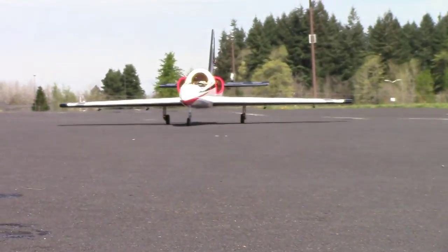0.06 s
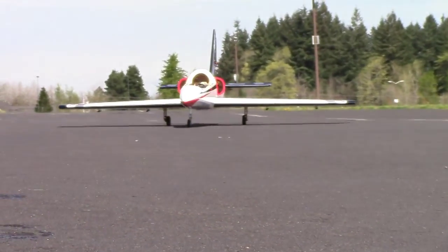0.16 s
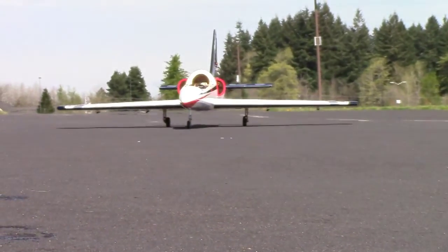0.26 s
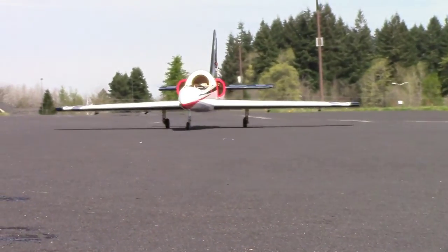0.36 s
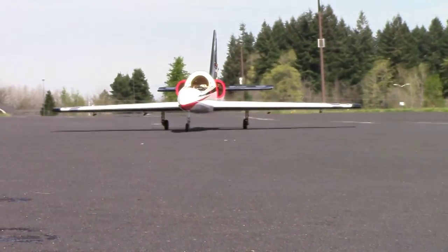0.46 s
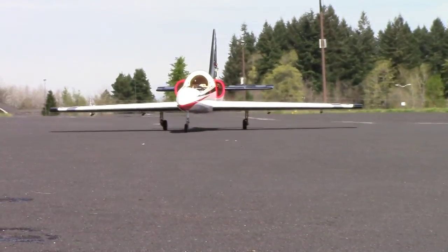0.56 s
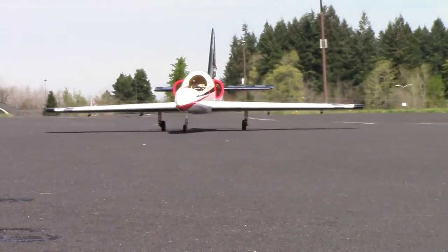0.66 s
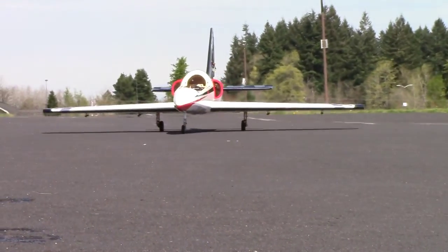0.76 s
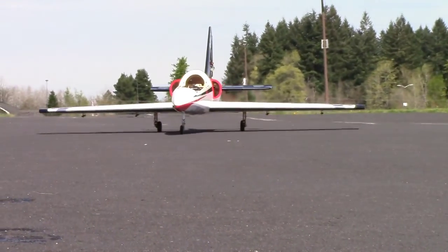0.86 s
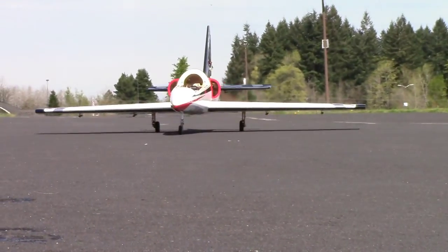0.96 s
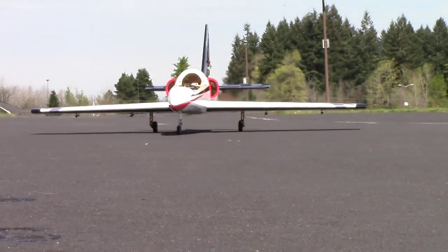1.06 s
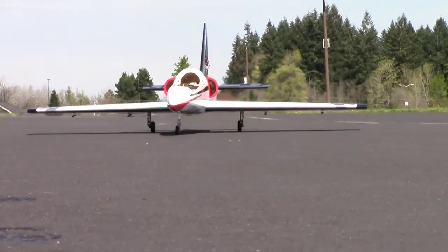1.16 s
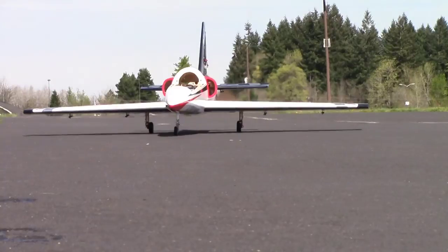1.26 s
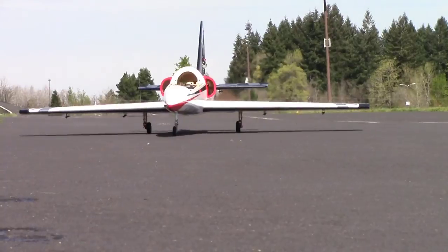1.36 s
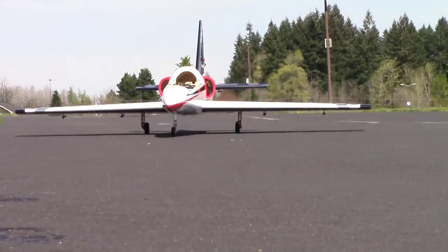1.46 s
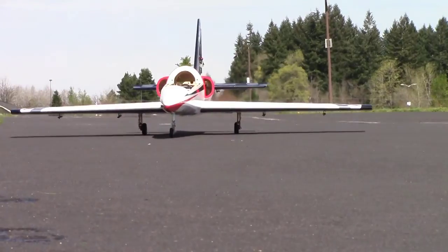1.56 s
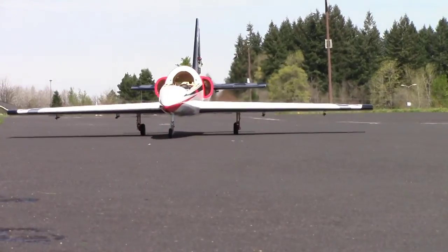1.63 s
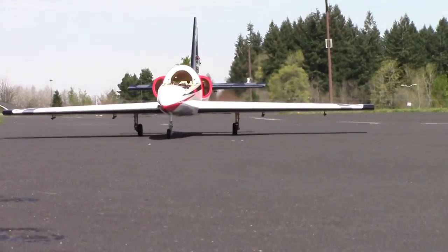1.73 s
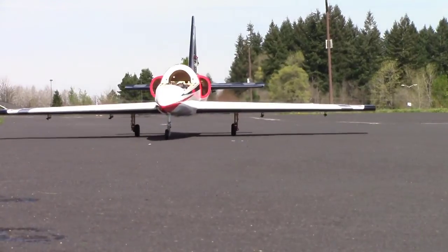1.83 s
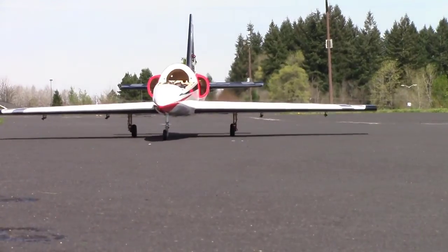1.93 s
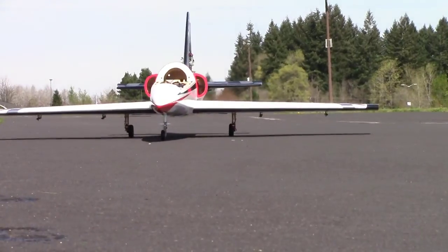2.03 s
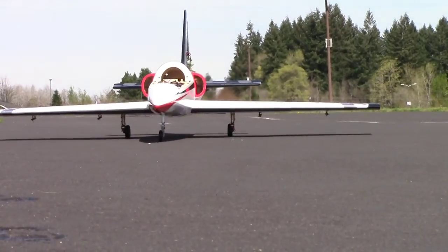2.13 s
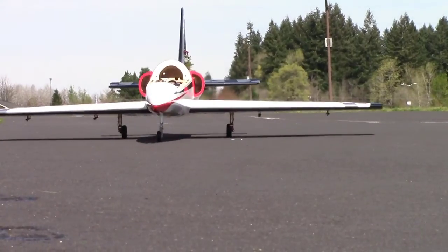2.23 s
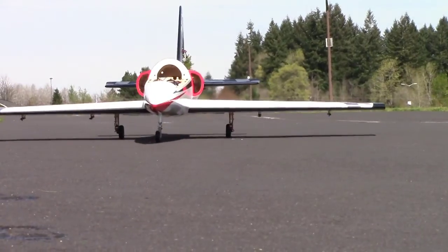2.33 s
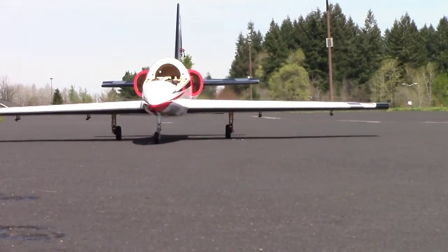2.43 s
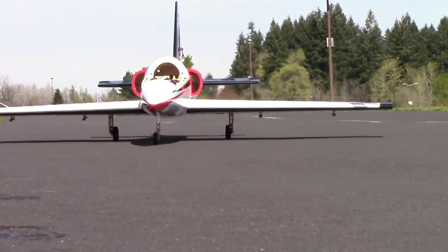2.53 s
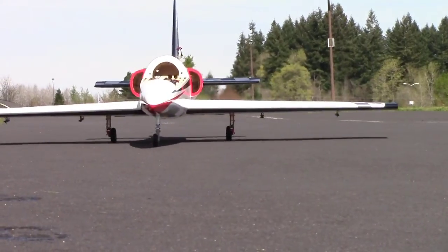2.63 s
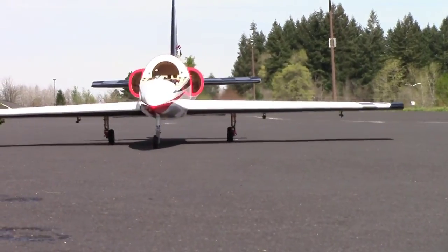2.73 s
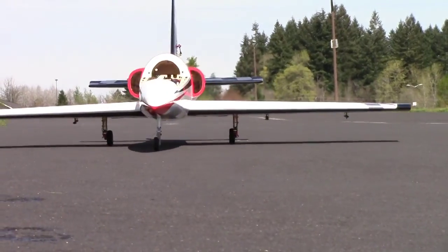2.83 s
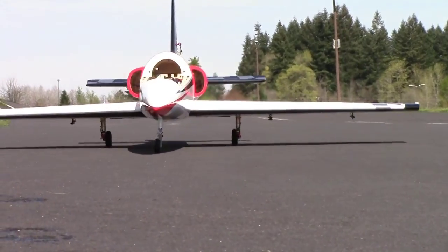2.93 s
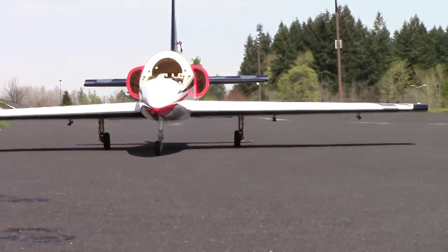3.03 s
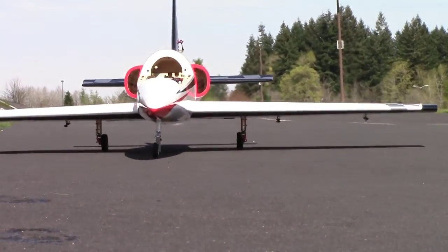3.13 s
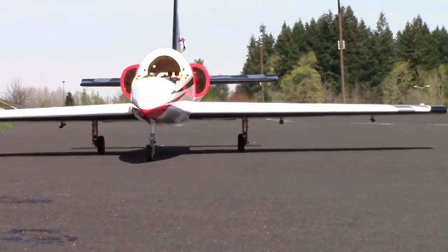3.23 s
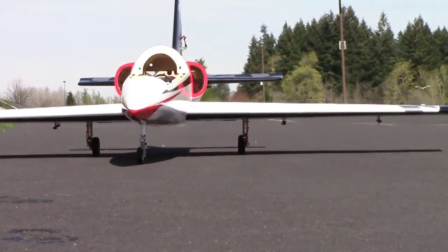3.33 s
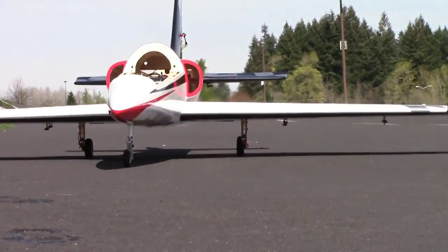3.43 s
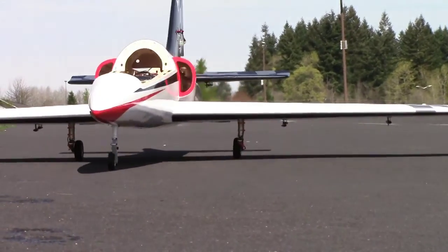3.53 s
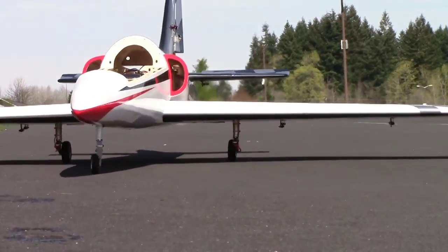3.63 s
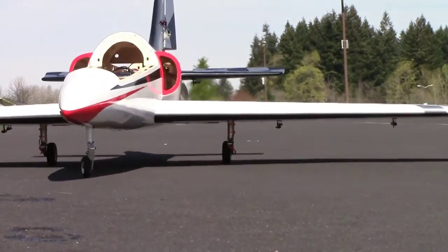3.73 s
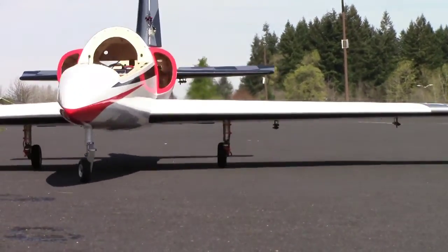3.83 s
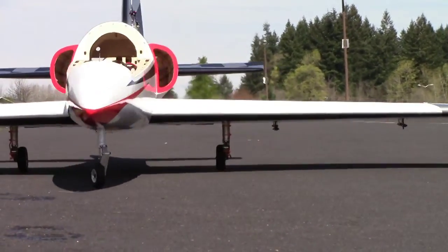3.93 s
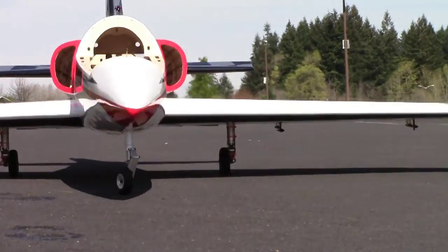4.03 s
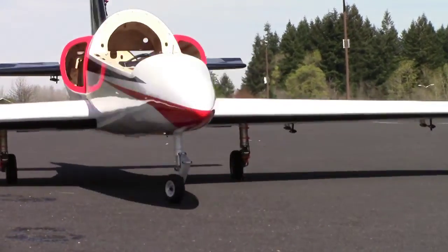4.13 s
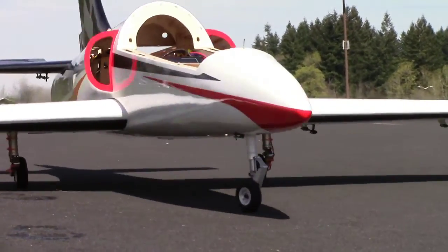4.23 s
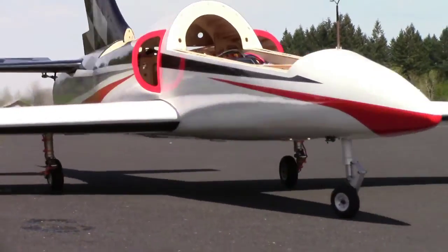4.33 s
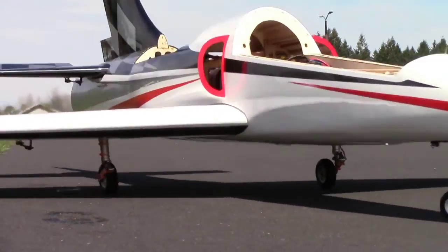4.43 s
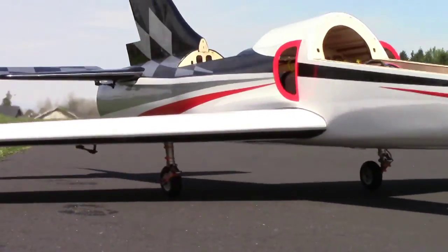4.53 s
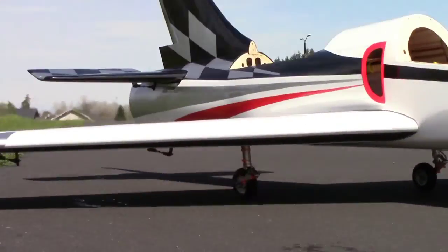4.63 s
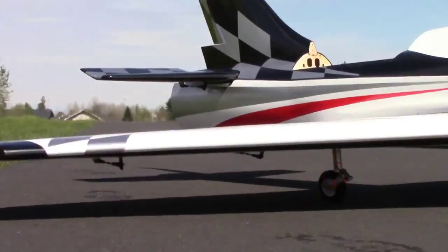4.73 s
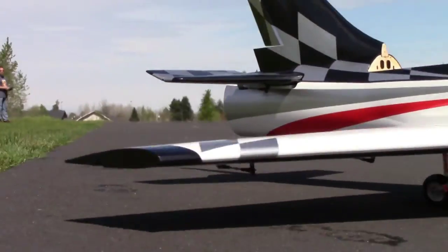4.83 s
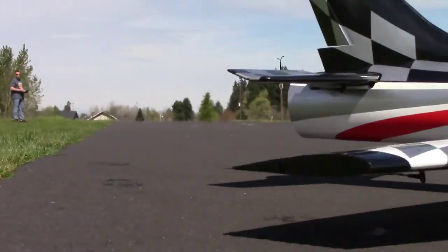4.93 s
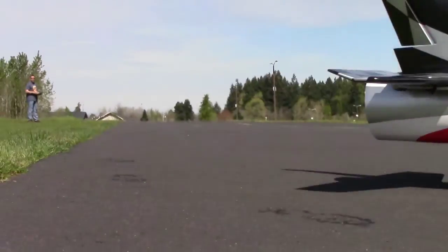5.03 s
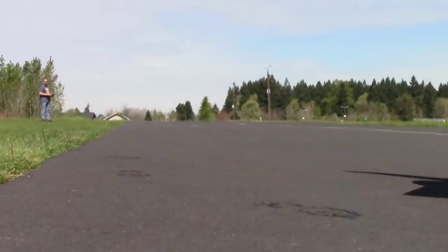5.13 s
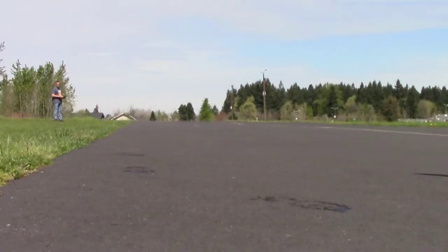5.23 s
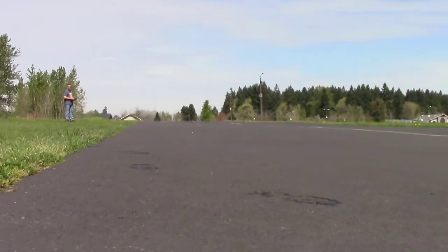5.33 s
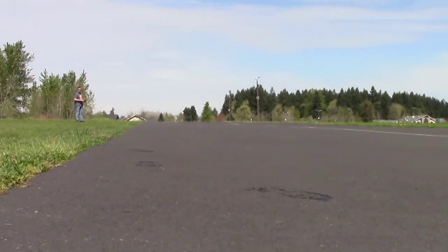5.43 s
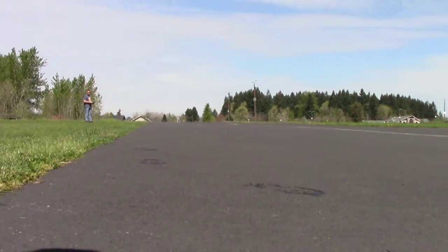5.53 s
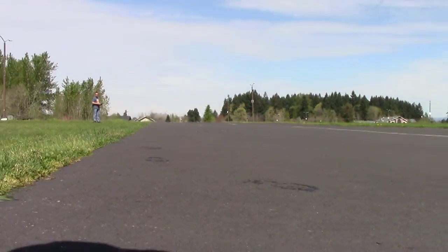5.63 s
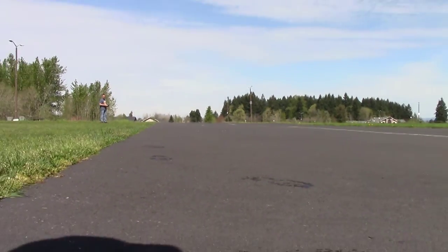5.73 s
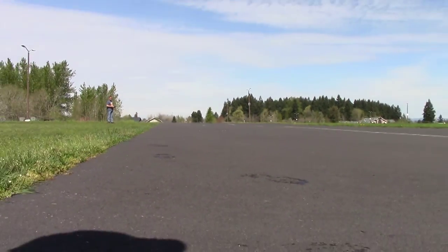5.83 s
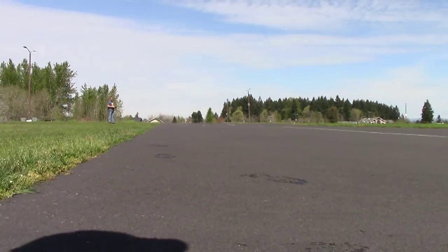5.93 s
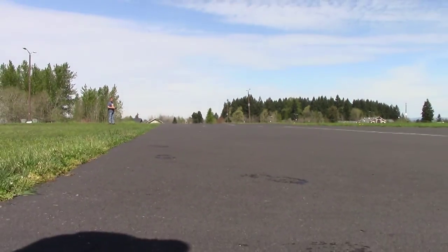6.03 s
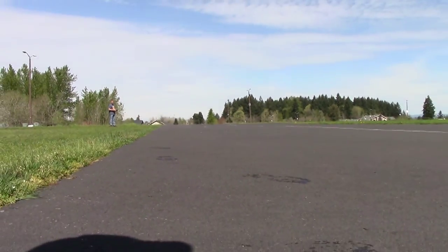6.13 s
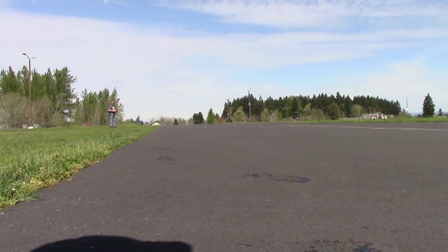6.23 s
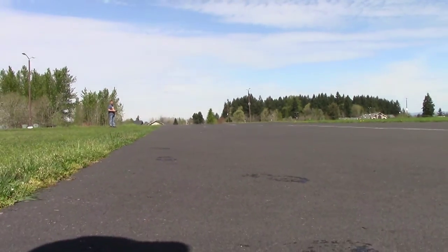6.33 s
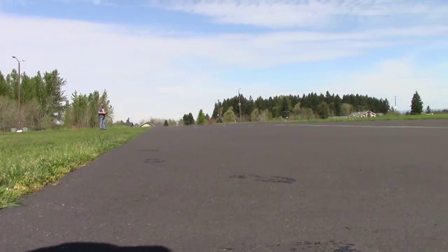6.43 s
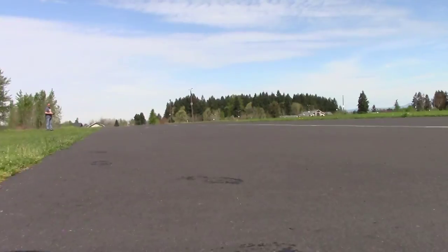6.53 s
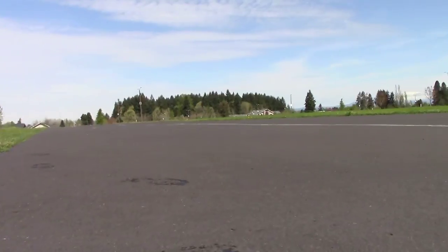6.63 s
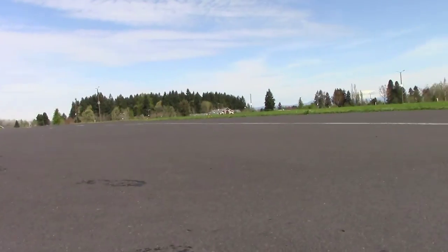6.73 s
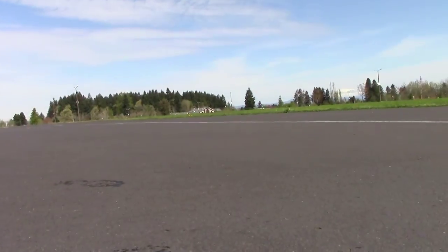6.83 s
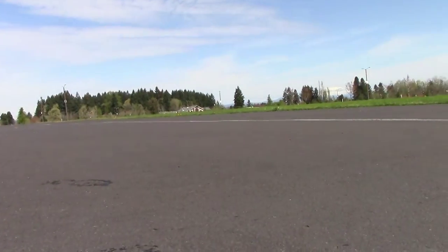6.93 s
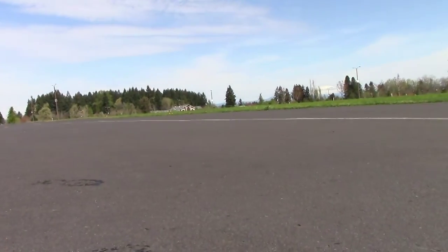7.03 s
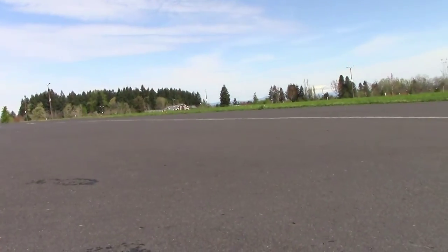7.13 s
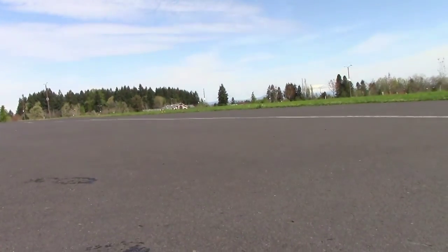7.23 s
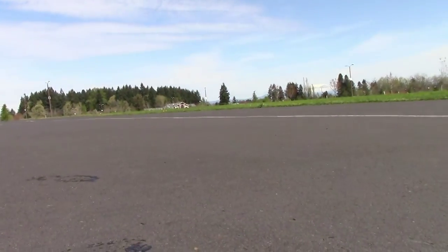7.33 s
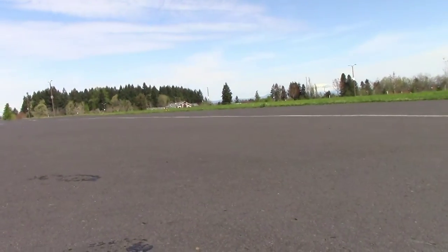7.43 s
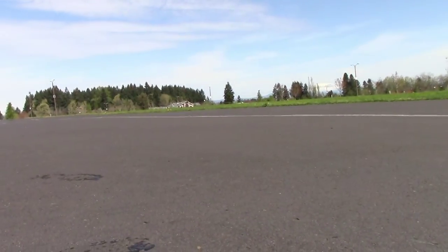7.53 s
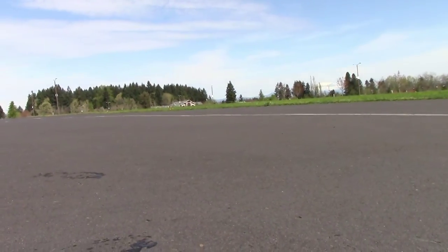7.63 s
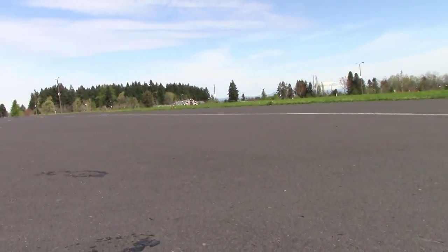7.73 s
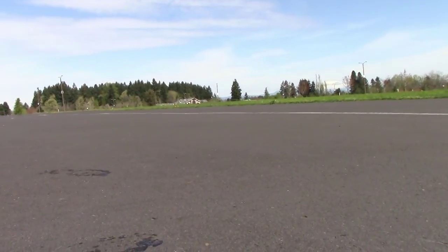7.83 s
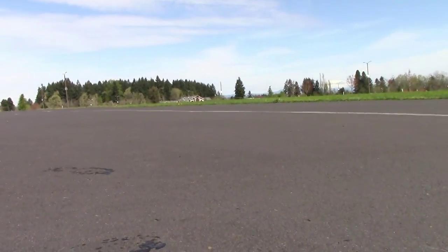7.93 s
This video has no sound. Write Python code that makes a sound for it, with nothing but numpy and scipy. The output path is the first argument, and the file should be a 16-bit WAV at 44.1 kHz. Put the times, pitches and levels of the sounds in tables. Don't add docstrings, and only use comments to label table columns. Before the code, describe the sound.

Piercing turbine whistle and airy intake roar approach outdoors, turn into hissing exhaust rush, then the pitch sinks as the throttle is cut.

```python
import sys
import numpy as np
from scipy import signal
from scipy.io import wavfile
from scipy.ndimage import uniform_filter1d, minimum_filter1d

SR = 44100
rng = np.random.default_rng(int(sys.argv[2]) if len(sys.argv) > 2 else 0)


def dump_mix(stems):
    frames = np.atleast_2d(stems).T
    limited = np.clip(frames, -1, 1)
    pcm = np.round(limited * 32767).astype(np.int16)
    wavfile.write(sys.argv[1], SR, pcm)


def volts_from_decibels(level):
    exponent = np.asarray(level, float) / 20
    return 10 ** exponent


N = 351477
HOP = 256

PASSING = 4.307, 5.41
ABEAM = 4.8, 5.6
NEARING, LEAVING, IDLING = (0.56, 2.76), (5.7, 5.95), (6.8, 7.3)
MID_SIDE = np.array([[1, 1], [1, -1]])

# (time [s], left-right difference in the treble [dB])
BEARING = [(0.0, 0), (2.24, 2), (3.7, 2), (4.11, 3), (4.33, .1), (4.8, -.1), (5.52, -6.5), (5.68, -9),
           (6.19, -10), (6.41, -11), (6.53, -8), (7.97, -3)]
# (frequency [Hz], share [0-1])
PAN_SHARE = [(500, 0.027), (1300, .12), (2400, 0.21), (4400, 0.26), (8000, 0.48), (15000, 1)]


def ramp(x, span):
    return np.clip((x - span[0]) / (span[1] - span[0]), 0, 1)


def curve(rows, t):
    s, value = np.transpose(rows)
    return np.interp(t, s, value)


def swells(rows, t):
    return sum(db * np.exp(-((t - s) / half) ** 2) for s, half, db in rows)


def read(points, hz):
    f, value = np.transpose(points)
    return np.interp(np.log(hz + 1), np.log(f + 1), value)


def evened(x):
    return x / np.sqrt(np.mean(x ** 2) + 1e-20)


def wander(count, length):
    once = uniform_filter1d(rng.standard_normal(count), int(length))
    return evened(uniform_filter1d(once, int(length)))


def port_turn(hz, t):
    delay_s = 1.6e-6 * curve(BEARING, t)
    near = 1 - .8 * ramp(t, (6.4, 6.8))
    ports = np.array([1, -1]).reshape(-1, *[1] * np.ndim(hz))
    return np.pi * hz * delay_s * near * ports


def spool(t):
    # (time [s], shaft speed before inertia [Hz])
    throttle = [(0.18, 624.0), (0.369, 635.7), (0.66, 674.2), (0.892, 716.0), (1.451, 838.0),
                (1.786, 900.8), (2.077, 940.1), (2.654, 977.3), (3.17, 992.0), (3.797, 996.1),
                (4.206, 972.6), (5.288, 952.0), (5.459, 953.3), (5.762, 941.7), (6.128, 896.5),
                (6.806, 731.9), (7.182, 670.4), (7.881, 609.5)]
    size = round(.2 / t[1])
    once = uniform_filter1d(curve(throttle, t), size=size, mode="nearest")
    return uniform_filter1d(once, size=size, mode="nearest")


def whistle_db(t):
    # (time [s], level [dB])
    aim = [(0, -47.5), (.261, -48), (.421, -15.5), (.83, -10.5), (1.479, -8), (1.626, -2.5), (2.299, -14),
           (2.555, -16.8), (3.029, -30.5), (3.833, -24.5), (4.164, -11.5), (4.79, -17.7), (5.01, -30),
           (5.53, -29.5), (5.64, -43.5), (6.284, -40.5), (6.792, -1.5), (7.97, -37.5)]
    # (time [s], half length [s], change [dB])
    fades = [(0.429, 0.05, -5.5), (0.619, 0.092, -5), (0.824, 0.032, -9.5), (1.097, 0.031, -4.9),
             (1.173, 0.028, -7), (1.499, 0.05, -7), (1.636, 0.083, -14.5), (1.916, 0.189, -14.5),
             (2.351, 0.089, -3.0), (2.934, 0.078, -2), (3.109, 0.013, -9.0), (3.274, 0.022, -5.5),
             (3.404, 0.058, 2.5), (3.594, 0.04, -5.6), (3.74, 0.083, -13.9), (4.348, 0.03, -8),
             (4.361, 0.008, -13), (4.548, 0.065, -12), (4.644, 0.2, 13), (4.705, 0.05, -10),
             (4.724, .01, -7), (4.777, 0.012, -7), (4.82, .02, 3), (4.843, .006, -11), (4.86, .006, -11),
             (4.913, .005, -14), (4.929, .005, -12), (4.952, .006, -8), (6.504, 0.012, -10),
             (6.595, 0.021, -14.5), (6.702, 0.077, -10.5), (6.863, 0.056, -14.5), (6.979, 0.061, -11.1),
             (7.221, 0.128, -13.5), (7.305, 0.02, -5.4), (7.406, 0.076, -7.5), (7.642, 0.033, 4),
             (6.18, .1, 5), (6.4, .04, 5), (5.2, .03, -4), (5.45, .04, 3)]
    return curve(aim, t) + swells(fades, t)


def shaft_orders(t, shaft_hz, blades):
    # (time [s], half length [s], change [dB])
    casing_swells = [(.45, .35, 8), (3.3, 0.67, 6), (5.05, 0.53, 6.5), (6.1, .4, -6), (7.55, 0.38, 9)]
    half_row_swells = [(.05, 0.28, -10), (.5, 0.22, 10), (2.0, .06, -8), (2.9, .8, 4.5), (3.75, 0.39, 11.5),
                       (4.72, .06, 8), (5.055, .035, 16), (5.15, .03, 14), (5.95, .45, -8), (6.29, .05, 8),
                       (6.62, .06, 3), (6.8, .04, 6), (7.0, 0.085, 12), (7.22, .04, -8), (7.4, 0.16, 9),
                       (.555, .02, -9), (3.35, .08, 3), (4.25, .03, -7), (4.85, .03, 5), (5.105, .025, 1),
                       (5.24, .02, 13), (5.33, .035, 10), (4.65, .02, 6), (6.4, .04, -6), (6.88, .04, -6),
                       (5.56, .025, 8), (5.75, .05, 4), (6.07, .06, 7), (6.55, .04, 4), (6.75, .045, 8),
                       (7.3, .04, 8), (7.63, .03, 5)]
    top_swells = [(.1, 0.18, -6), (.68, .15, -2), (1.1, 0.23, 2), (6.3, 0.34, -9), (7.03, .07, 5),
                  (7.42, 0.09, 9), (7.95, .15, -6), (.55, .025, -5), (.66, .04, -6), (.8, .04, -7),
                  (1.12, .03, -5), (1.4, .04, -8), (6.9, .05, -5), (7.21, .07, -14), (7.58, .035, -7),
                  (7.75, .13, 5)]
    # (shaft multiple [-], level at idle [dB])
    idle_orders = [(13, -50), (14, -44), (15, -41.5)]
    behind = ramp(t, PASSING)
    shaft_db = -46 + 14 * ramp(t, (3.3, 4.54)) + swells(casing_swells, t)
    half_row_db = -45.5 + swells(half_row_swells, t)
    top_db = -37.5 - 8 * behind + swells(top_swells, t)
    top_db -= 30 * ramp(shaft_hz, (880, 900))
    orders = [(1, shaft_db), (6, half_row_db), (18, top_db), (blades, whistle_db(t))]
    idle_db = -(shaft_hz - 625) * 0.079 - 14. * behind
    orders += [(k, db + idle_db) for k, db in idle_orders]
    overtone_db = -49 - (shaft_hz - 625) * .15
    return orders + [(2 * blades, overtone_db)]


def compressor():
    # (time [s], share [0-1])
    shadowed = [(4.8, .006), (4.92, .2), (5.0, 0.6), (6.3, 0.55), (6.7, 0.027), (7.97, 0.045)]
    blades = 12
    t = np.arange(N) / SR
    shaft_hz = spool(t)
    turns = np.cumsum(shaft_hz) / SR
    behind = ramp(t, PASSING)
    pan_db = curve(BEARING, t) * np.array([[.5], [-.5]])
    out = np.zeros((2, N))
    for k, db in shaft_orders(t, shaft_hz, blades):
        scattered = curve(shadowed, t) * min(k / blades, 1) ** 1.7
        scattered = np.clip(scattered + 0.0013 + 0.3 * (k > blades), 0, 1)
        blur = (wander(N, 330) + 1j * wander(N, 390)) / np.sqrt(2)
        slip = 0.044 * wander(N, 2700) * np.array([[1], [-1]]) * (1 + 1.1 * behind)
        path = np.sqrt(1 - scattered) + np.sqrt(scattered) * blur
        path = path * volts_from_decibels(db + read(PAN_SHARE, k * shaft_hz) * pan_db)
        phase = 2 * np.pi * k * turns + slip + port_turn(k * shaft_hz, t)
        out += np.sqrt(2) * (path * np.exp(1j * phase)).real
    return out


def resonant(modes, hz, steep):
    power = sum(volts_from_decibels(2 * db) / (1 + (2 * (hz - f) / width) ** 2) ** steep for f, width, db in modes)
    return (power / power.sum())[:, None]


def layer_db(level, rules, shade, t):
    usual_db = -20
    change = curve(level, t) - usual_db
    load = ramp(spool(t), (787, 960))
    swept = ramp(t, (5.55, 5.63))
    levels = []
    for (db, share, *more_db), rows in zip(rules, shade):
        added = sum(a * b for a, b in zip(more_db, (load, swept)))
        levels.append(usual_db + db + share * change + added + swells(rows, t))
    return levels


def intake(hz, t):
    # (time [s], level [dB])
    drawn = [(0, -27), (.32, -22), (.6, -20), (.82, -21), (.96, -23.5), (1.28, -23.5), (1.5, -28),
             (2.08, -25), (2.4, -27), (3.2, -22.5), (3.45, -21.5), (4.0, -19), (4.16, -17), (4.35, -18.5),
             (4.5, -19), (5.3, -17.5)]
    # (level above the intake [dB], share of its changes [-], added by load [dB])
    layers = [
        (9.5, 1.11, -11),
        (0.43, 1.14, 0.26),
        (-5, 0.55, 4.5),
    ]
    # (time [s], half length [s], change [dB])
    shade = [
        [(.05, 0.16, -5), (.85, .1, -3), (1.25, .15, -1.5), (4.82, 0.13, -30), (5.3, .2, 10)],
        [(4.72, 0.25, -22)],
        [(0.0, 0.11, -6), (1.28, .08, 3), (1.85, 0.21, -5), (4.75, 0.089, 2), (5.15, 0.19, -19)],
    ]
    # (centre [Hz], width [Hz], level [dB])
    low_far, low_near = [(355, 200, -17.5), (525, 80, -3), (635, 128, -5), (983, 134, -2), (1045, 82, 0.5)], [(277, 110, -12.5), (528, 81, -1), (621, 150, -3), (900, 88, -7),
                                           (1014, 105, -1), (1100, 164, -2.5)]
    high_far, high_near = [(1423, 130, 1.5), (1668, 76, 0), (2013, 71, -3.5), (2570, 56, -14),
                           (3250, 200, -14.5), (3830, 410, -19.5), (4910, 2800, -21.5)], [(1387, 100, 3), (1700, 760, -5), (2235, 280, -3.5),
                                             (2810, 72, -20), (3300, 310, -11.5), (3810, 710, -15.5),
                                             (4900, 900, -18.5)]
    hiss_far, hiss_near = [(6400, 780, -7), (8700, 1200, 2.5), (9620, 2100, 3.5), (11400, 1700, -6.5),
                           (13000, 1400, -15), (14800, 1800, -24)], [(6340, 540, -12), (7900, 470, -6), (9150, 1000, 3.5),
                                             (10560, 1900, -7.5), (12500, 1300, -20), (14800, 1500, -32)]
    near = ramp(t, NEARING)
    far = 1 - near
    lower_duct = far * resonant(low_far, hz, steep=1.88) + near * resonant(low_near, hz, steep=2.16)
    upper_duct = far * resonant(high_far, hz, steep=0.98) + near * resonant(high_near, hz, steep=1.55)
    hiss = far * resonant(hiss_far, hz, steep=2.2) + near * resonant(hiss_near, hz, steep=1.5)
    shapes = lower_duct, upper_duct, hiss
    return sum(shape * volts_from_decibels(2 * db) for shape, db in zip(shapes, layer_db(drawn, layers, shade, t)))


def exhaust(hz, t):
    # (time [s], level [dB])
    wash = [(4.4, -16), (4.65, -19.5), (4.8, -16.5), (5.03, -18.5), (5.28, -17.5), (5.55, -14.5),
            (5.66, -15.5), (5.78, -22), (6.02, -24.5), (6.3, -30), (6.52, -27.5), (6.78, -23), (6.9, -25.5),
            (7.15, -23), (7.4, -17.5), (7.6, -19), (7.97, -16)]
    # (level above the wash [dB], share of its changes [-], added by load [dB], added once swept past [dB])
    layers = [
        (0.33, 0.24, 4.5, 0.87),
        (0.18, 1.03, 0.1, 0.16),
        (-11, 0.79, -1.1, -4.5),
        (-6.5, 0.84, -0.9, -10),
    ]
    # (time [s], half length [s], change [dB])
    shade = [
        [(4.4, 0.042, -11), (4.65, 0.077, -7), (5.15, 0.091, -7), (4.9, .15, -3), (5.7, .1, -.7),
         (5.25, .08, -2)],
        [(7.75, .22, -2), (4.85, .2, -2)],
        [(4.45, 0.33, 9), (4.9, 0.054, 0), (5.04, 0.079, 3), (5.33, 0.11, -1), (5.8, .08, -3), (6.0, .08, 4),
         (6.3, .12, -5), (6.65, 0.29, 8), (7.02, 0.067, 5.5)],
        [(4.9, 0.085, 1), (5.28, .07, -4), (5.45, .11, 2.5), (6.43, .08, -20), (7.07, .1, 5), (7.27, .07, -3)],
    ]
    # (centre [Hz], width [Hz], level [dB])
    pipe_open, pipe_idling = [(432.5, 108, 3.5), (670, 240, -1.5), (1013, 170, -2.5)], [(408, 74, 4), (537, 140, -4), (734, 120, -0.5), (970, 470, -5)]
    rush_close, rush_leaving, rush_idling = [(1285, 400, 4.5), (1710, 310, 4), (2200, 740, 2),
                                             (2730, 1300, -3.5), (3500, 790, -11), (3700, 410, -32)], [(1316, 96, 5.5), (1950, 540, 0.5),
                                                           (2880, 630, -7.5), (3640, 380, -10)], [(1340, 320, -1),
                                                                                 (1794, 160, 4.5),
                                                                                 (2110, 180, -6),
                                                                                 (2540, 210, -3.5),
                                                                                 (2860, 230, -8),
                                                                                 (4060, 1100, -14.5)]
    jet_hiss, jet_top = [(4630, 3100, -0.49), (6300, 1200, 0.95), (8000, 2700, -2.2)], [(8690, 3700, 9), (10700, 1900, 4), (12100, 1700, -8)]
    gone, idle = ramp(t, LEAVING), ramp(t, IDLING)
    pipe = (1 - idle) * resonant(pipe_open, hz, steep=1.53) + idle * resonant(pipe_idling, hz, steep=2.1)
    rush = (1 - gone) * resonant(rush_close, hz, steep=1.83)
    rush += (gone - idle) * resonant(rush_leaving, hz, steep=1.2)
    rush += idle * resonant(rush_idling, hz, steep=1.16)
    shapes = pipe, rush, resonant(jet_hiss, hz, steep=2.04), resonant(jet_top, hz, steep=2.4)
    return sum(shape * volts_from_decibels(2 * db) for shape, db in zip(shapes, layer_db(wash, layers, shade, t)))


def flame(hz, t):
    # (time [s], level [dB])
    burning = [(0, -27), (.66, -21.5), (1.4, -28), (2.31, -43.5), (4.73, -24.5), (5.23, -12), (5.4, -17.5),
               (6.21, -20), (6.6, -19.5), (7.97, -18.5)]
    # (time [s], half length [s], change [dB])
    surges = [(.56, .04, -9), (1.49, .05, -7), (1.6, 0.045, 4.5), (1.84, 0.073, 6), (6.73, 0.047, 7.5),
              (6.88, 0.042, -5)]
    # (centre [Hz], width [Hz], level [dB])
    tube = [(191.8, 64, 2.5), (392, 33, -5)]
    return resonant(tube, hz, steep=1.55) * volts_from_decibels(2 * (curve(burning, t) + swells(surges, t) - 3.0))


def glimpses(hz, t):
    # (start [s], end [s], from [Hz], to [Hz], width [Hz], level [dB])
    brief = [(4.2, 4.85, 2260, 2150, 230, -23), (0.0, .8, 10800, 10000, 3000, -30),
             (4.65, 5.0, 2320, 2350, 150, -26.5), (4.64, 5.1, 680, 430, 170, -20),
             (5.438, 5.84, 2750, 2530, 600, -20.5), (6.45, 6.78, 3400, 3250, 220, -37),
             (0, .25, 520, 520, 110, -22.5), (.2, .65, 560, 520, 120, -23),
             (.62, 1.05, 1030, 990, 170, -15.5), (4.38, 4.66, 600, 560, 120, -22),
             (4.72, 4.86, 420, 420, 60, -20), (4.72, 4.95, 660, 600, 70, -21),
             (4.74, 5.12, 425, 390, 70, -20), (4.55, 5.25, 9600, 8200, 1500, -26),
             (5.36, 5.62, 8600, 8300, 2200, -32), (6.0, 6.6, 8600, 8000, 2200, -43),
             (6.65, 7.3, 5800, 6500, 700, -38), (6.92, 7.2, 9600, 9400, 1600, -36),
             (7.3, 7.56, 9600, 9200, 1800, -36), (7.6, 7.85, 9300, 9200, 1800, -37),
             (4.45, 5.27, 450, 410, 120, -21), (3.897, 5.1, 13000, 12000, 3900, -35),
             (4.157, 4.84, 3300, 3300, 2000, -26.5), (6.602, 7.243, 1330, 1310, 170, -28.5)]
    power = 0
    for start, end, from_hz, to_hz, width, db in brief:
        along = ramp(t, (start, end))
        centre = from_hz + (to_hz - from_hz) * along
        shape = 1 / (1 + (2 * (hz[:, None] - centre) / width) ** 2) ** 3.0
        power = power + shape / shape.sum(0) * volts_from_decibels(2 * db) * np.sin(np.pi * along) ** 2
    return power


def wind(hz, t):
    # (time [s], level [dB])
    gusting = [(0.0, -45), (0.35, -40), (.62, -35), (0.8, -35.5), (1.2, -46), (1.33, -41), (2.2, -62),
               (3.7, -75), (5.22, -56), (6.04, -44), (6.5, -34), (6.95, -46), (7.2, -36)]
    # (centre [Hz], width [Hz], level [dB])
    buffets = [(35, 40, -24), (99.4, 25, 9)]
    return resonant(buffets, hz, steep=6.6) * volts_from_decibels(2 * (curve(gusting, t) - 2.0))


def unlike_db(hz, t):
    # (frequency [Hz], level [dB])
    side_front = [(30, -28), (60, -8), (110, -30), (200, -39), (700, -38), (2380, -50), (4400, -36),
                  (8120, -38), (15000, 3)]
    side_behind = [(30, -34), (60, -17), (110, -44), (380, -29), (1290, -15), (2380, -16.5), (4400, -8),
                   (8120, -9), (15000, 26)]
    wide = ramp(t, ABEAM)
    hz = hz[:, None]
    front_db = np.minimum(read(side_front, hz) - 1.5, -30.)
    behind_db = np.minimum(read(side_behind, hz) - 3., -10. + 6. * np.clip(hz / 3000 - 3, 0, 1))
    wind_db = (22.0 + 7.0 * wander(len(t), 5)) * np.clip(1.6 - hz / 100.0, 0, 1)
    return (1 - wide) * front_db + wide * behind_db + wind_db


def airflow():
    frames, hz = N // HOP + 9, np.fft.rfftfreq(8 * HOP, 1 / SR)
    t = np.arange(frames) * HOP / SR
    behind = ramp(t, PASSING)
    power = (1 - behind) * intake(hz, t) + behind * exhaust(hz, t)
    power += flame(hz, t) + glimpses(hz, t)
    power *= ((hz / 135.44) ** 8 / (1 + (hz / 133.63) ** 8))[:, None]
    power += wind(hz, t)

    a, b, c, d, patches = rng.standard_normal((frames, len(hz), 5)).T
    mid, unlike = a + 1j * b, c + 1j * d
    patches = evened(uniform_filter1d(uniform_filter1d(patches, 22, 0), 16, 1))
    patch_db = 0.92 + (0.4 + 0.4 * behind) * np.clip(hz / 8000.0, 0, 1)[:, None]
    gusts = wander(frames, 3.5) * np.clip(hz / 8600.0, 0, 1.6)[:, None] * (.5 + 1.2 * behind)
    flutter = volts_from_decibels(patch_db * patches + 0.78 * gusts)

    unlike = volts_from_decibels(unlike_db(hz, t)) * unlike
    pan_db = read(PAN_SHARE, hz)[:, None] * curve(BEARING, t) / 2 * (.5 + behind / 2)
    z = np.array([volts_from_decibels(pan_db) * (mid + unlike), volts_from_decibels(-pan_db) * (mid - unlike)])
    z *= np.exp(.6j * ramp(t, ABEAM) * port_turn(hz[:, None], t))
    unit = np.std(signal.istft(mid, nperseg=8 * HOP, noverlap=7 * HOP)[1]) / np.sqrt(len(hz))
    z *= np.sqrt(power) * flutter / unit
    return signal.istft(z, nperseg=8 * HOP, noverlap=7 * HOP)[1][:, :N]


def distant_motor():
    # (time [s], level [dB])
    hum = [(0, -43), (.4, -39), (.6, -50), (1.2, -54), (2.0, -62), (3.3, -63), (3.8, -75), (7.97, -80)]
    t = np.arange(N) / SR
    turns = np.cumsum(93.5 + .6 * wander(N, 6000)) / SR
    return np.sqrt(2) * volts_from_decibels(curve(hum, t) + 1.5 * wander(N, 3000)) * np.sin(2 * np.pi * turns)


def scene():
    return compressor() + airflow() + distant_motor()


def low_pass(x):
    return signal.sosfilt(signal.butter(12, 15700, fs=SR, output="sos"), x)


def record(dry):
    # (frequency [Hz], level [dB])
    faintest = [(10300, -68.5), (12500, -72.5), (15500, -75.5)]
    least = minimum_filter1d(np.minimum(1 / (abs(dry).max(0) + 1e-9), 1), size=401)
    limited = MID_SIDE @ dry / 2 * uniform_filter1d(least, size=200)
    hz, _, z = signal.stft(limited, SR, nperseg=8 * HOP, noverlap=4 * HOP)
    bands = (abs(z[:, :-1]) ** 2).reshape(2, 64, 16, -1).mean(2)
    band_db = np.repeat(10 * np.log10(bands + 1e-20), 16, axis=1)
    least_db = read(faintest, hz[:-1])[:, None] - np.array([0, 4.5])[:, None, None]
    faint = (band_db < least_db) & (hz[:-1, None] > faintest[0][0])
    faint[1, :16] = band_db[1, :16] < -73
    z[:, :-1] *= ~faint
    z[1, -1] = 0
    kept = signal.istft(z, SR, nperseg=8 * HOP, noverlap=4 * HOP)[1][:, :N]
    return low_pass(MID_SIDE @ kept)


dry = scene()
out = record(dry)
dump_mix(out)
```